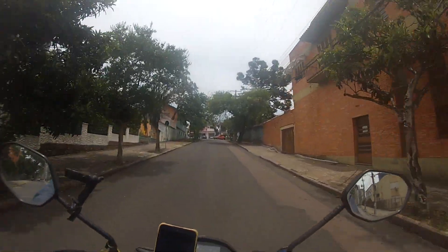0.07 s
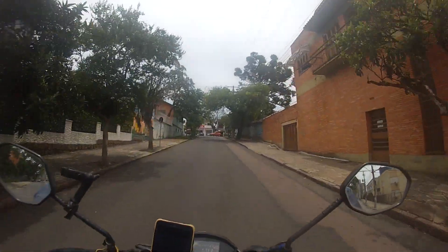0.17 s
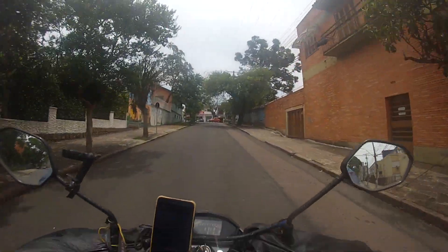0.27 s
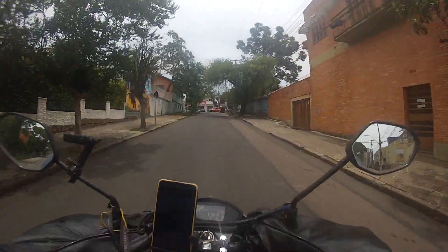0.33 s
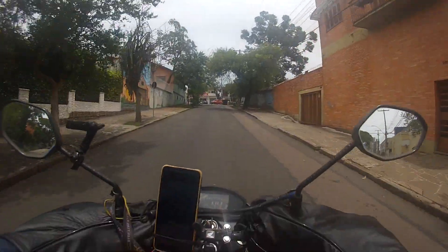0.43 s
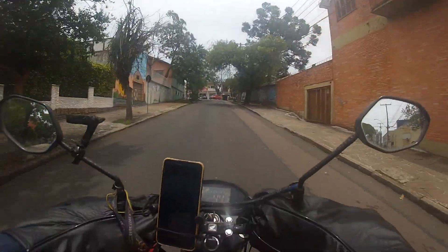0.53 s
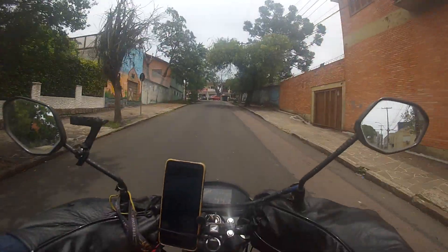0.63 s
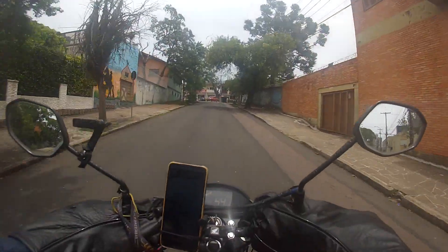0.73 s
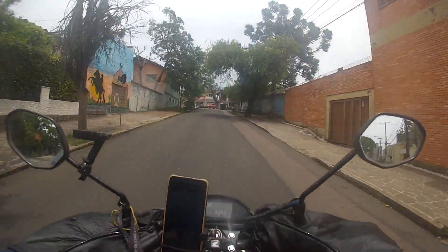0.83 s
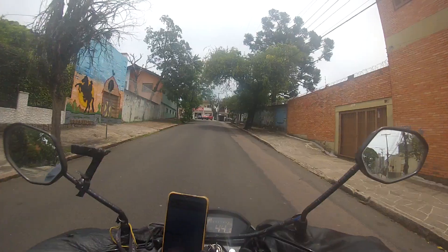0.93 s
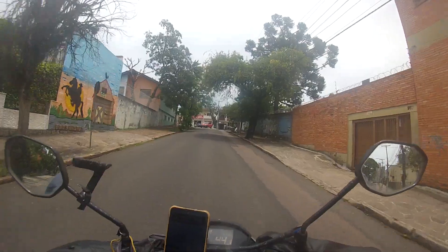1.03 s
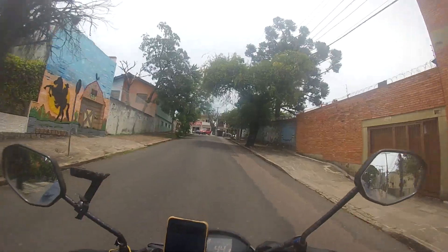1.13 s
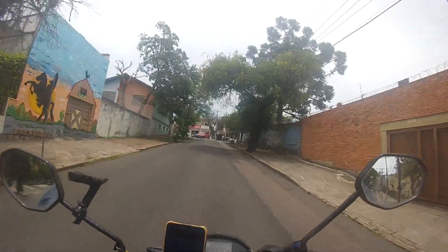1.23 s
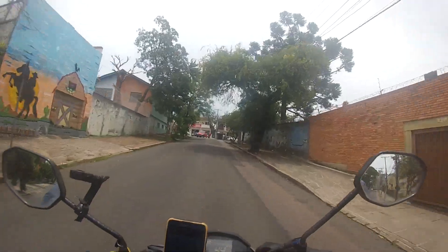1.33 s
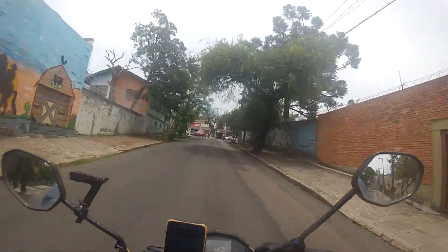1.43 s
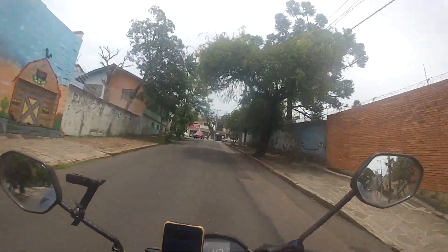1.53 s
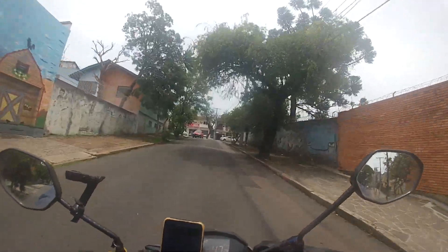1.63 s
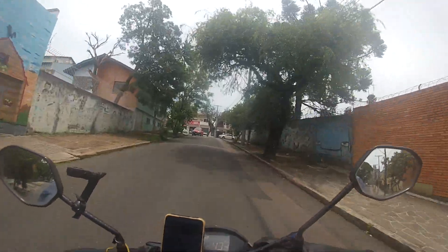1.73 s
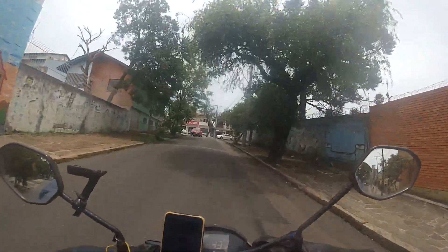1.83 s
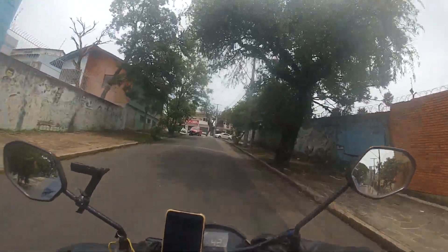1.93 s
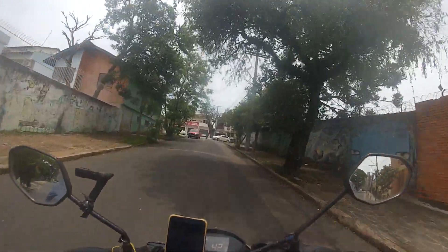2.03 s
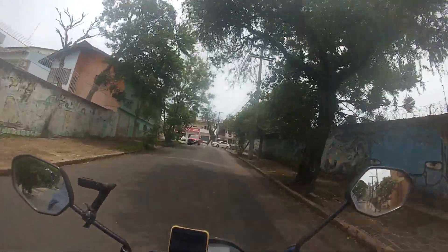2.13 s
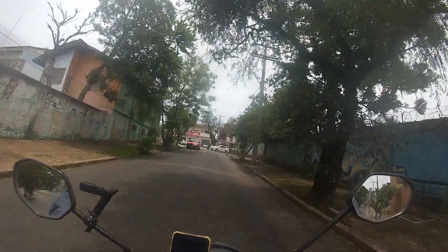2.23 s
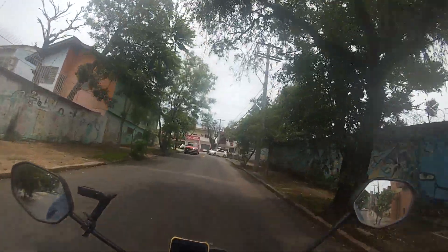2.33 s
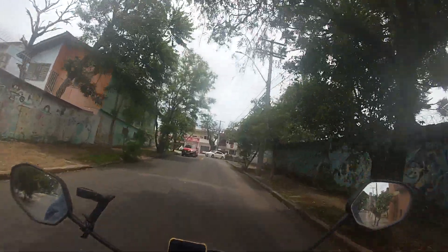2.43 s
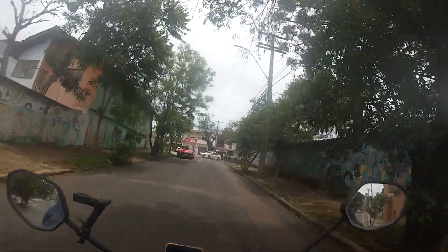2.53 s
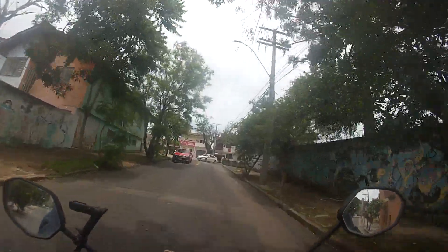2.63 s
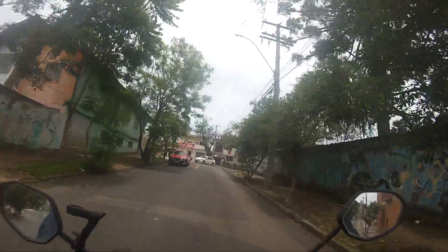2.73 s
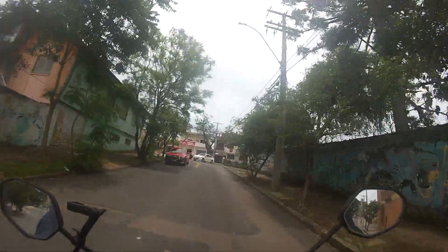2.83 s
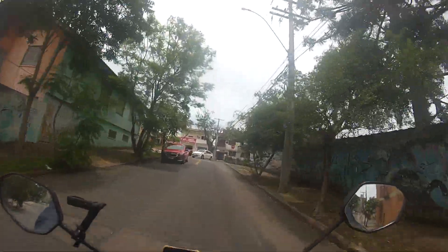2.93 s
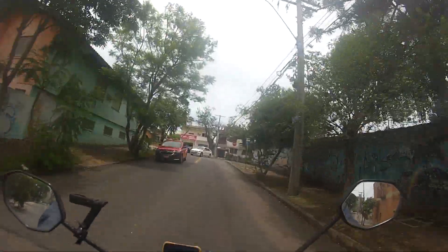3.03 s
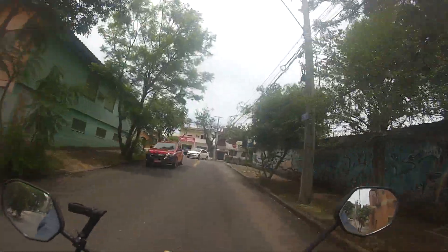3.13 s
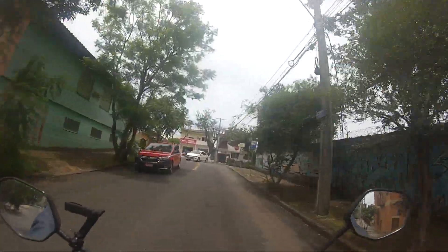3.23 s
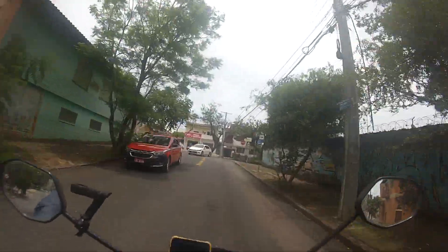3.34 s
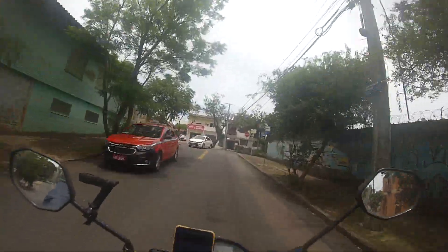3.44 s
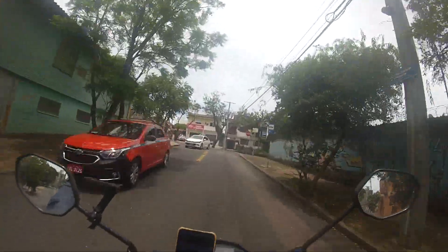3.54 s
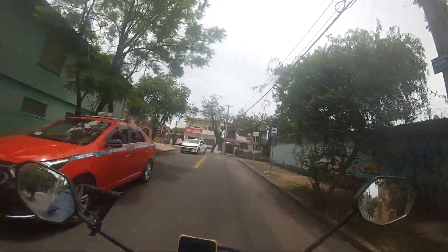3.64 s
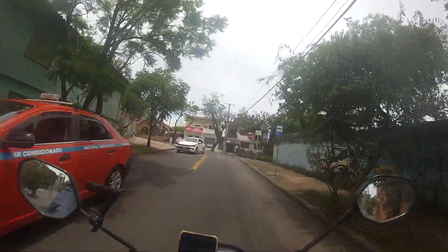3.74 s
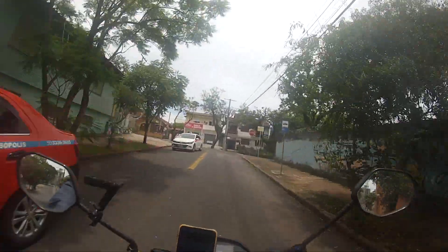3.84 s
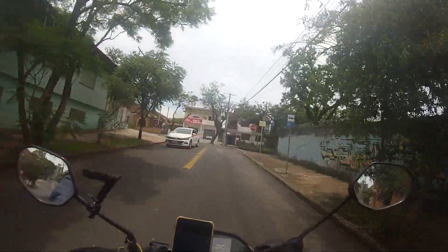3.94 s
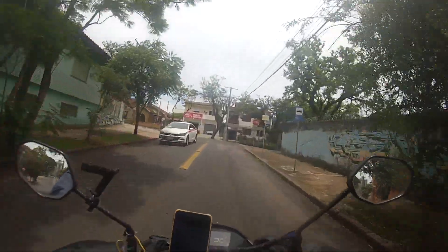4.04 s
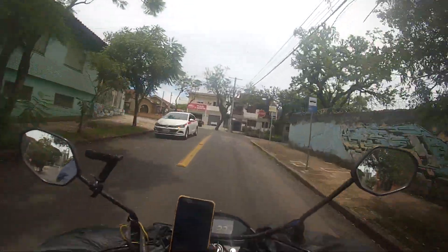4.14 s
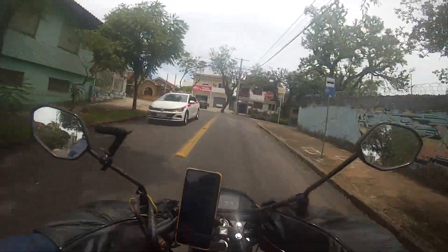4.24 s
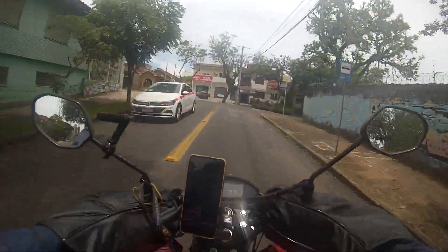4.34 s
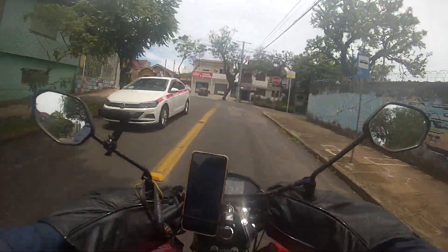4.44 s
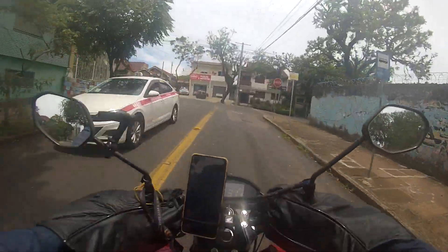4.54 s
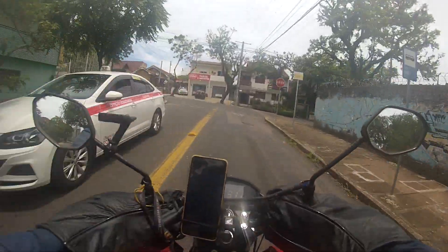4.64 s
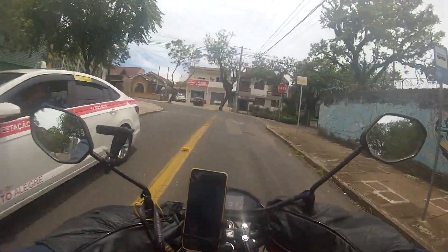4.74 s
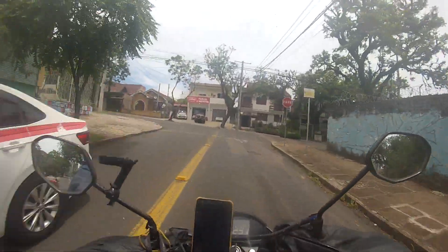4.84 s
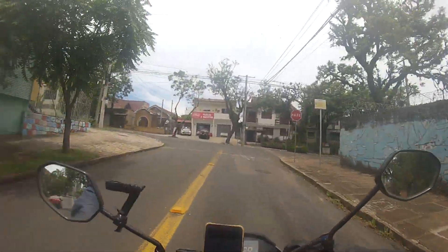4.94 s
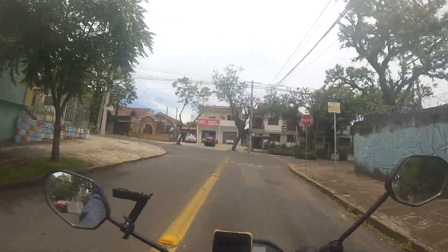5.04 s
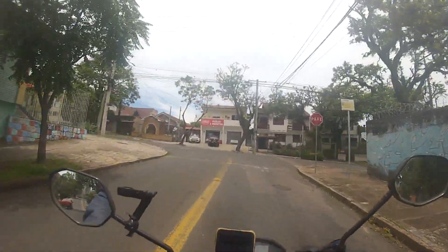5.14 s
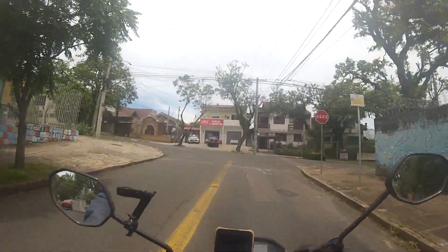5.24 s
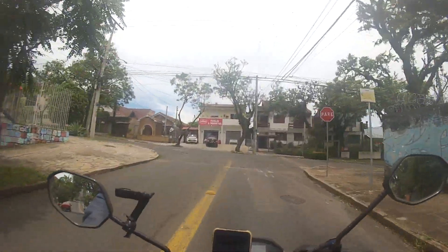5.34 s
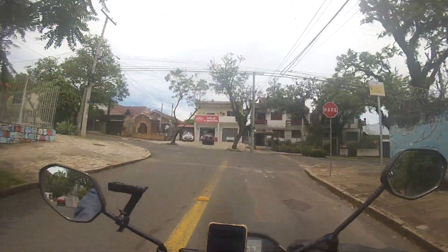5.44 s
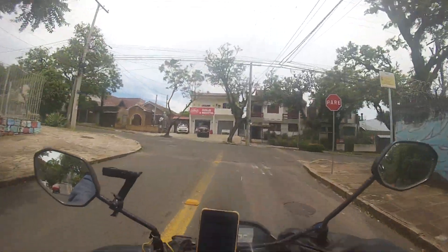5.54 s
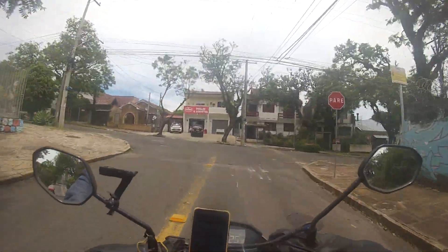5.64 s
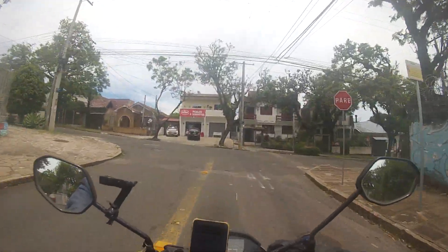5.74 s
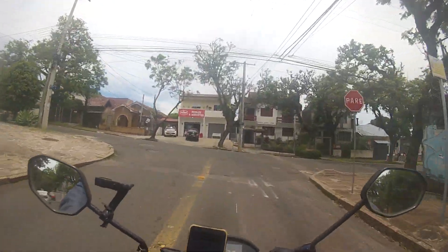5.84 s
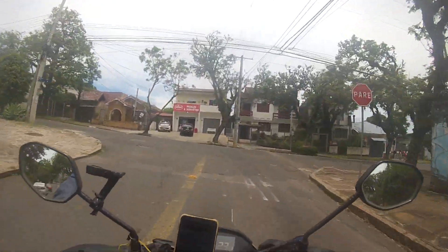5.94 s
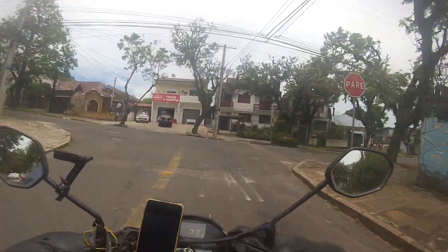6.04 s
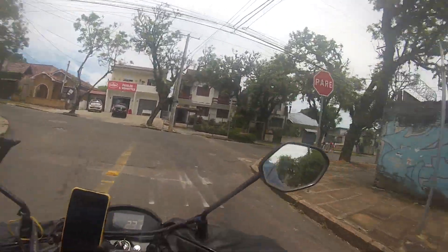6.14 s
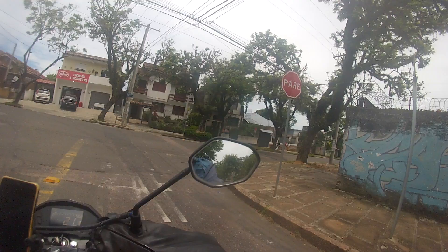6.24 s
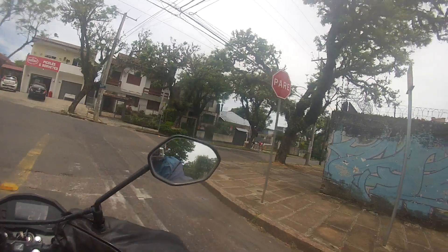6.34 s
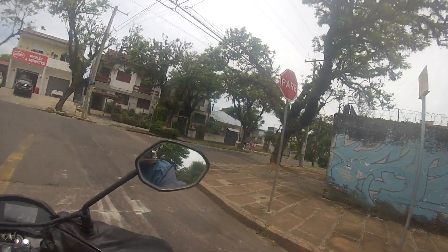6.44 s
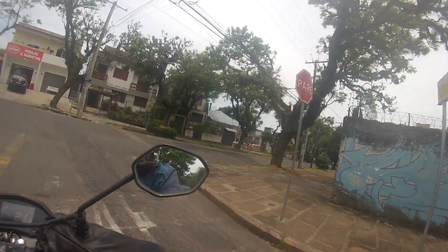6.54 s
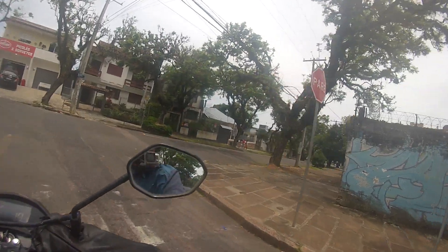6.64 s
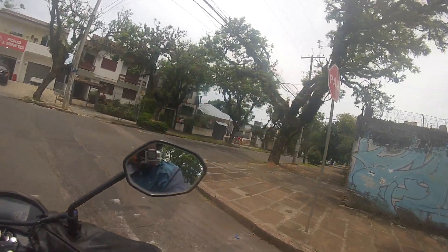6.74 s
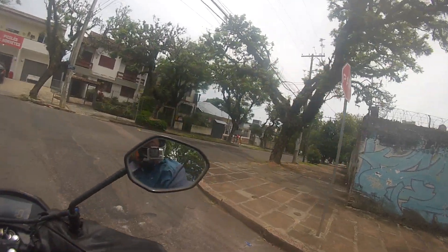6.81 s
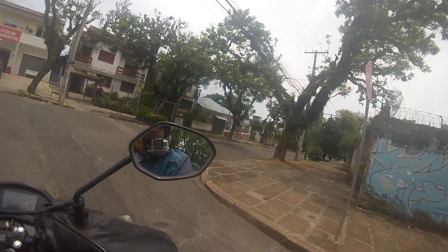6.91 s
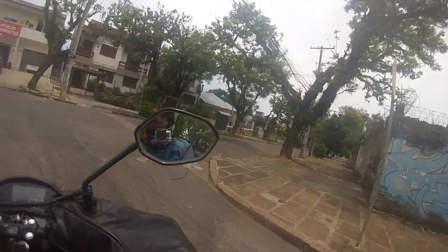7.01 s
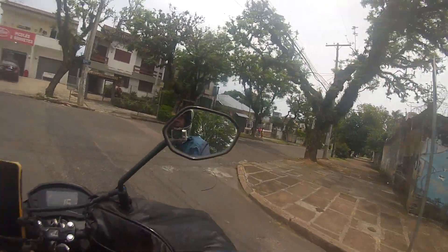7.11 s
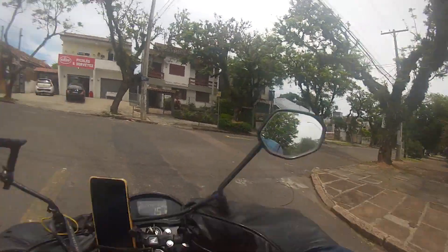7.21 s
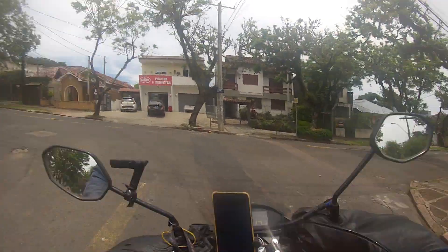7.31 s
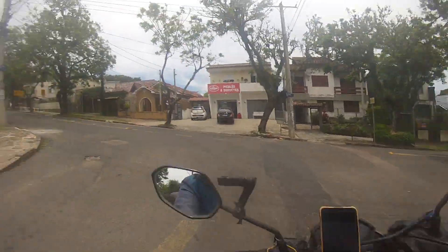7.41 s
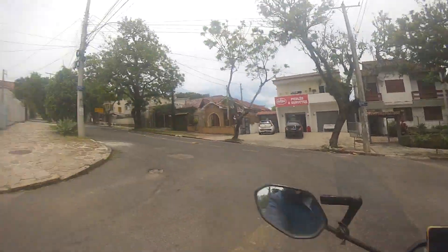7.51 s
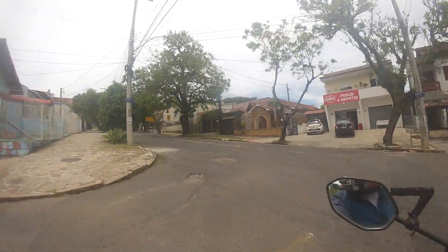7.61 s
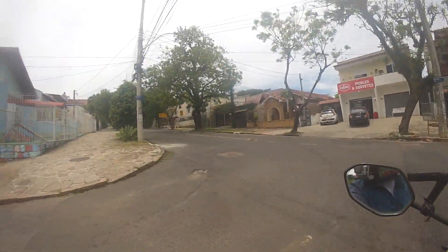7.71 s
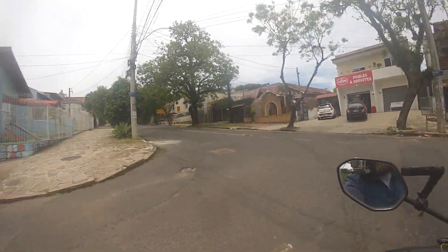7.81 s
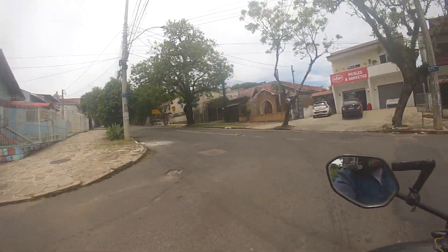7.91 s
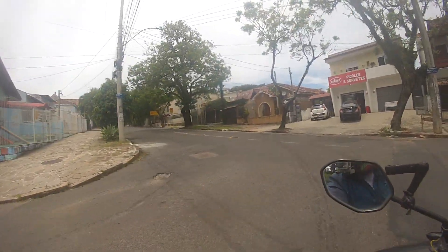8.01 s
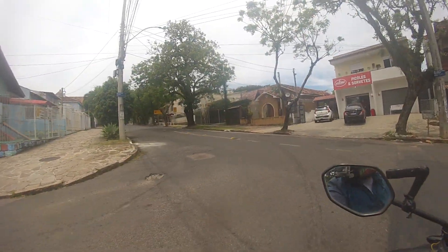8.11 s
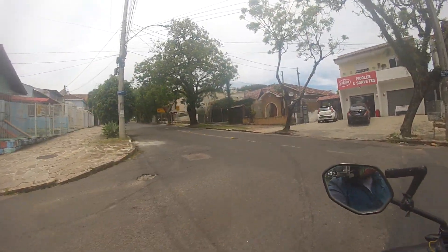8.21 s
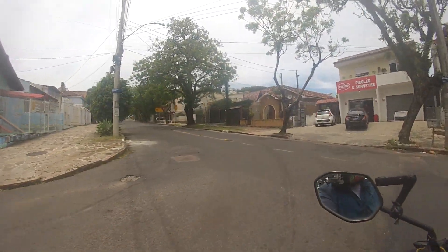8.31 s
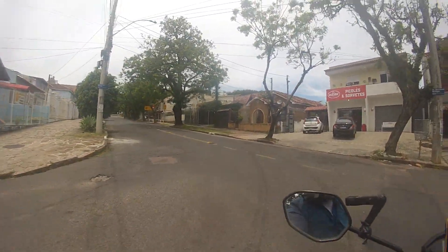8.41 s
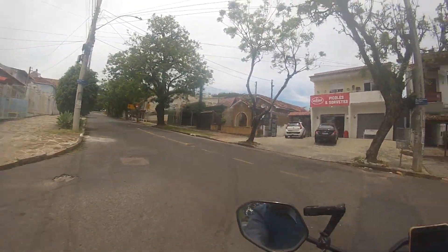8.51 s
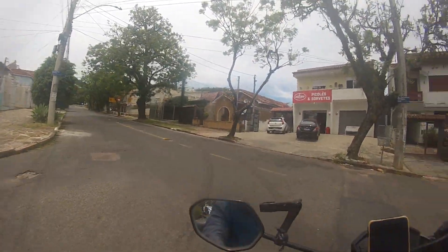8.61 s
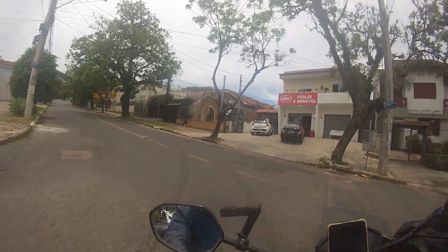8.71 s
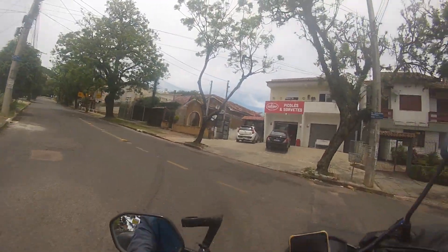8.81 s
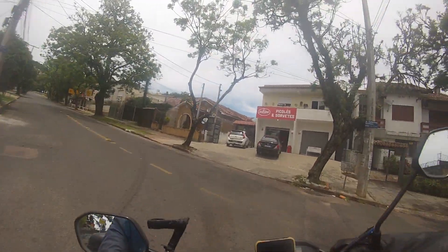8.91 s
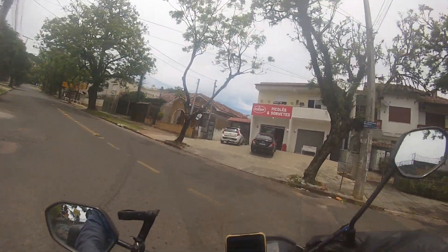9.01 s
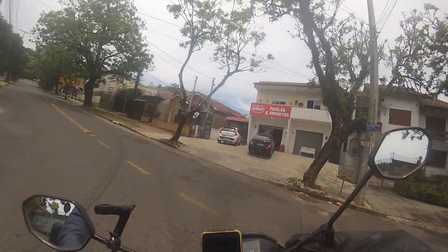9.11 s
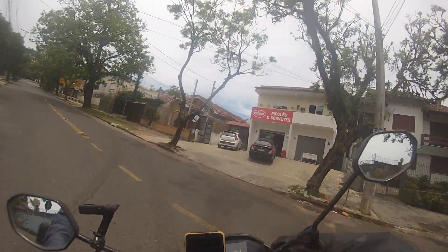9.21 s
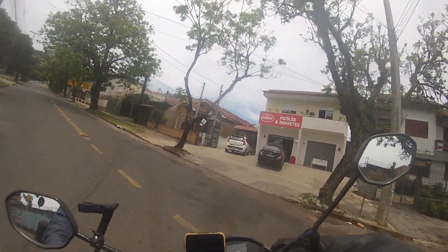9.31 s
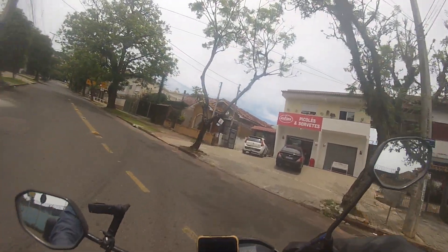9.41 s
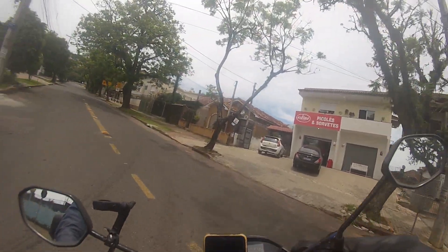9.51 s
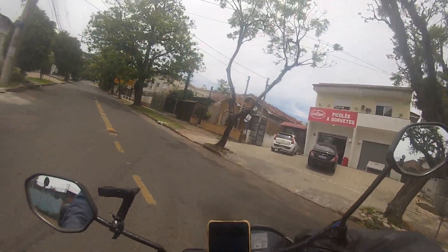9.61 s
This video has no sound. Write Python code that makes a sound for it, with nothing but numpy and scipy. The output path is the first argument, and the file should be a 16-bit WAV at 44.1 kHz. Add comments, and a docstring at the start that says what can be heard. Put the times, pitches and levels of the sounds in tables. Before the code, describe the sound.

Heard from a motorcycle rider's helmet on a street: heavy low wind buffeting over a small single-cylinder engine's throb, metallic clatter and gear whine. The throttle closes, loose parts knock over bumps, a strong gust thumps and crackles the microphone, and two cars swish by. The engine drops to a slow putter, clunks into gear, and its revs rise again in much calmer air.

```python
"""A small single-cylinder motorcycle, heard from the rider's helmet, pulls, slows and clunks into gear.
Its revs then climb again. Exhaust puffs excite silencer modes, clatter shakes the casing, gear teeth sing.
Drive-train tones flutter; a whistle climbs twice. Shaped noise makes wind, tyres, two cars, intake and hiss.
Decaying modes make helmet thuds, knocking loose parts and the gear clunk; noise bursts make crackles.
Revs and throttle drive the engine's levels; the bike's speed drives those of wind, tyres and drive train."""
import sys
import numpy as np
from scipy import signal
from scipy.fft import rfft, irfft, next_fast_len
from scipy.io import wavfile
from scipy.ndimage import uniform_filter1d

SR = 44100
rng = np.random.default_rng(int(sys.argv[2]) if len(sys.argv) > 2 else 0)


def pcm_store(signal):
    """Save signal as 16-bit PCM."""
    levels = np.round(np.clip(np.atleast_2d(signal), -1, 1) * 32767)
    wavfile.write(sys.argv[1], SR, levels.astype(np.int16).T)


N = 426006
TIME = np.arange(N) / SR

# The rider's hand. Each row: time in seconds, firings per second, throttle from 0 to 1.
ENGINE = [(0, 23.5, .96), (.37, 24.9, 0.98), (.55, 23.9, .92), (1.2, 25, 0.91), (1.93, 24, 0.78),
          (2.1, 22.8, .5), (2.55, 22.7, 0), (3.4, 19.7, 0.37), (3.8, 21.5, 0.24), (4.5, 18.2, 0.13),
          (6.1, 12.5, 0.27), (7.2, 12.9, 0.06), (7.55, 17.1, 0.38), (7.73, 16.5, .33), (7.81, 15.3, 0),
          (7.99, 21.4, 0.33), (8.15, 22.6, 0.47), (8.33, 20, 0.45), (8.75, 22.6, .45), (9.45, 25.4, 0.62),
          (9.66, 26.6, 0.82)]
# The bike's speed. Each row: time in seconds, speed as a share of cruising speed.
SPEED = [(0, 1.12), (.8, 1.01), (1.5, 0.96), (3.3, 0.77), (4.4, 0.71), (5.2, 0.55), (5.75, 0.5),
         (6.2, 0.39), (6.9, 0.23), (7.55, 0.34), (8, 0.22), (9.15, 0.22), (9.66, 0.22)]

# Engine levels. Each holds: dB at cruising revs with the throttle shut, dB added at full throttle,
# dB per doubling of the revs.
EXHAUST_LAW = (-45, 4, 0.8)
CLATTER_LAW = (-59, 8.1, 3.3)
INTAKE_LAW = (-65.5, 22.8, 0.62)
PRIMARY_LAW = (-73.5, 8.6, 5.6)
GEARBOX_LAW = (-71.5, 13.2, 5.2)   # level before the casing
CRUISE_FIRING_HZ = 24
PULSE_THROTTLE = 0.38   # the load throbs fully from this throttle upwards

# Silencer modes. Each row: frequency in Hz, relative level in dB, 60 dB decay time in seconds.
EXHAUST_MODES = [(46.7, 6, 0.11), (83, -10, 0.12), (111, -8.5, 0.15), (173, -14, 0.11), (229, -28, 0.15),
                 (290, -31, 0.11)]
PISTON_SHARE = 0.53   # height of the weaker puff, in the turn between firings
# Modes of crankcase, fins and covers. Each row: frequency in Hz, nominal width in Hz, level in dB.
CASING_MODES = [(807.7, 13.4, 3.5), (916, 47, 2.5), (1132, 125, 2), (1463, 132, 4.5), (1643, 132, 6),
                (1973, 120, -1.5), (2293, 440, -1), (2609, 85, -3.5), (3090, 88, -13.5), (3450, 250, -6.5),
                (4293, 110, -12), (5290, 720, -17.5), (6200, 340, -15), (7170, 880, -21.5),
                (7970, 140, -19)]
CASING_WIDENING = 1.07   # factor on every nominal width
# Gearbox tooth rates. Each row: multiple of the firing rate, relative level in dB.
TEETH = [(82, -10), (121, -1.5), (141, -1), (176, -11), (186, 0), (268, -13), (320, -19)]
PRIMARY_TEETH = 68   # tooth contacts per firing
# Swells of the primary-gear whine. Each row: start in seconds, length in seconds, level in dB.
PRIMARY_WHINES = [(.17, 0.23, -47.5), (.48, .06, -45), (2.0, 0.14, -56), (3.73, .12, -54.5),
                  (8.05, 0.19, -62), (8.75, 0.38, -64), (9.07, 0.52, -58)]
PRIMARY_ATTACK_S, PRIMARY_RELEASE_S = 0.12, 0.15
# Swells of the gearbox whine. Each row: start in seconds, length in seconds, level in dB before the casing.
GEARBOX_WHINES = [(2.0, 0.45, -60), (7.88, 0.19, -57.5), (8.08, 0.19, -58), (8.33, 0.37, -57.5),
                  (8.66, 0.31, -62), (8.98, 1, -55)]
WHINE_ATTACK_S, WHINE_RELEASE_S = 0.082, 0.11
# Whistle under hard pull, one table for each glide.
# Each row: time in seconds, frequency in Hz, level in dB before throb and flutter.
WHISTLES = [
    [(.05, 1590, -62), (.18, 1612, -46), (.29, 1640, -45), (.35, 1690, -52), (.42, 1750, -63)],
    [(8.35, 1480, -72), (8.55, 1515, -59), (8.72, 1530, -59), (9.02, 1560, -59), (9.15, 1610, -58),
     (9.28, 1650, -54), (9.45, 1655, -54), (9.56, 1690, -70)],
]
# Drive-train tones. Each row: frequency in Hz, level in dB at cruising speed.
RINGING = [(812, -63), (1075, -62.5), (1660, -59), (3440, -70.5)]
RINGING_DOUBLING_DB = 9.5   # dB per doubling of the speed
# Faint squeak as the throttle closes. The row: start in seconds, length in seconds, frequency in Hz, level in dB.
SQUEAK = (2.01, .025, 4720, -67)

# Air and road levels. Each holds: dB at cruising speed, dB per doubling of the speed.
HUM_LAW = (-28.5, 12.4)
EDDY_LAW = (-30.5, 7.7)
GUST_LAW = (-26, 11)
TYRE_LAW = (-51.5, 3.54)

# Big gusts that shove the microphone. Each row: start in seconds, length in seconds, level in dB.
GUSTS = [(3.08, 0.15, -21), (3.3, 0.26, -16), (4.35, 0.6, -29), (5.77, 0.25, -23), (6.15, 0.32, -26.5),
         (6.6, 4, -41), (8.2, 0.24, -34)]
GUST_ATTACK_S, GUST_RELEASE_S = 0.1, 0.26
# Eddies breaking on the shell. Each row: start in seconds, length in seconds, level in dB.
EDDIES = [(0, 0.4, -18), (.58, 0.05, -21), (.98, 0.56, -25), (1.56, 0.13, -21), (1.89, 0.068, -19),
          (2.3, 0.2, -23), (2.78, 0.14, -25), (3.46, 0.18, -24), (3.89, 0.14, -24.5), (4.36, 0.094, -22.5),
          (4.74, 0.26, -25.5), (5.65, 0.093, -22.5), (8.1, 0.4, -40)]
EDDY_ATTACK_S, EDDY_RELEASE_S = 0.043, 0.14
# Passing cars. Each row: start in seconds, length in seconds, level in dB.
CARS = [(3.3, 0.95, -55.5), (4.6, 0.47, -52.5)]
CAR_APPROACH_S, CAR_LEAVE_S = 0.58, 0.32

# Noise spectra: slow pressure swings, shell boom, helmet air space, tyres, air intake, microphone hiss.
# Each row: frequency in Hz, relative density in dB per Hz.
GUST_COLOUR = [(11, -10.5), (14.5, 13), (18, 12), (25, -11.5), (32, -4), (42, -31), (58, -19)]
BUFFET_COLOUR = [(30, -11.5), (41, -34.5), (49, -1), (54, 2), (58, -1.5), (63, -4), (75, -19.5), (100, -27)]
HELMET_COLOUR = [(55, 1.5), (74, 5.5), (90, 0.5), (118, 1), (138, -9), (160, -11.5), (191, 0.5),
                 (206, -3.5), (224, 1.5), (241, -1), (259, -14.5), (294, -9), (322, -26.5), (500, -29.5)]
ROAD_COLOUR = [(160, 10), (340, -3), (470, 1.5), (700, -3), (910, 0), (1090, 0.5), (1260, -5), (1510, -1.5),
               (1910, -1), (2560, -8), (2800, -26), (5000, -22), (8000, -25.5), (14000, -49)]
INTAKE_COLOUR = [(160, 6.5), (340, 4), (470, 1.5), (700, -8.5), (910, -1.5), (1090, 0), (1260, -4),
                 (1510, 1.5), (2000, -1.5), (2560, -6.5), (2800, -14.5), (4300, -17), (8000, -25),
                 (14000, -45)]
HISS_COLOUR = [(400, 1), (3100, 6), (6100, -3), (9100, -4), (12100, -5), (15300, -9.5)]
HISS_DB = -64.5

# Crackles in the port. Each row: time in seconds, burst level in dB before filtering.
CRACKLES = [(3.4447, -43), (3.4492, -41), (3.4997, -38)]
# Thuds through the helmet. Each row: time in seconds, level in dB before softening, frequency in Hz,
# 60 dB decay time in seconds.
THUDS = [(0.361, -9.5, 60.5, 0.12), (3.058, -11.5, 43.2, 0.21), (3.175, -27, 225, 0.12),
         (3.395, -24, 203, 0.12), (3.43, -15, 30, .1), (3.488, -26, 40.4, 0.053), (3.568, -12.5, 48, 0.088),
         (4.257, -29, 229, 0.11), (5.656, -23, 53, 0.15), (7.65, -27, 50.7, 0.17), (8.075, -27, 55.5, 0.16),
         (8.989, -20.5, 44, 0.091)]
# Loose parts knocking over bumps. Each row: time in seconds, peak level in dB, main pitch in Hz,
# 60 dB decay time in seconds, share of clear ring from 0 to 1.
KNOCKS = [(2.338, -48, 410, 0.039, 0.5), (2.338, -36.5, 1600, 0.022, .25), (2.341, -32, 870, 0.056, 0.46),
          (2.463, -41, 930, 0.041, .65), (2.464, -44, 1450, .03, .6), (3.291, -38, 1440, .04, 0.4),
          (3.295, -43, 1120, 0.06, 0.8), (3.540, -36.5, 1350, 0.048, 0.46), (5.546, -47, 1120, .04, .6),
          (5.745, -49, 1170, .045, .65), (5.870, -37, 1103, 0.059, .65), (6.358, -45, 1580, 0.046, 0.6),
          (6.357, -44.5, 383, 0.23, 0.36), (6.860, -50, 3960, .04, .05), (6.929, -51, 4000, .05, .05),
          (7.507, -38, 1130, 0.039, 0.65), (8.537, -47, 500, 0.1, 0.67)]
KNOCK_ATTACK_S = 0.002
# Fittings chattering over rough asphalt. Each row: start in seconds, length in seconds, level in dB.
RATTLES = [(3.23, 0.1, -50), (3.39, 0.057, -49)]
RATTLE_EDGE_S = 0.043
# Spectrum of the chatter. Each row: frequency in Hz, relative density in dB per Hz.
RATTLE_COLOUR = [(900, 0), (1150, 6), (2300, 2), (2900, -11), (6000, -32)]
# Gear dogs engaging and rebounding. Each row: time in seconds, mean strike level in dB.
SHIFT = [(7.6492, -34.5), (7.6556, -43), (7.6626, -43.5), (7.6682, -48), (7.679, -52)]
# Gearbox modes. Each row: frequency in Hz, relative level in dB, 60 dB decay time in seconds.
CLUNK_MODES = [(105, -8, .09), (172, -5, 0.061), (485, -13.5, 0.18), (560, 1, 0.075), (835, -7.5, 0.094),
               (1060, 9, 0.0095), (1100, -10, 0.024), (1340, 2, 0.021), (1465, 0, 0.063), (1725, -13, .03),
               (2540, -8, 0.035), (3270, -26, .02)]
CUTOFF_HZ = 15300


def from_db(db):
    """Logarithmic level: decibels become an amplitude ratio."""
    return 10 ** (np.asarray(db) / 20)


def rms_one(x):
    """Normalisation: scale a signal to unit mean power."""
    return x / np.sqrt(np.mean(x ** 2) + 1e-20)


def in_time(rows):
    """Linear interpolation: one curve per column, a value for every sample."""
    seconds, *columns = np.transpose(rows)
    return [np.interp(TIME, seconds, column) for column in columns]


def drift(rate):
    """Low-passed noise: a random wander of spread 1, weakening above the rate in Hz."""
    hz = np.arange(N // 2 + 1) * SR / N
    spectrum = rfft(rng.standard_normal(N)) / (1 + (hz / rate) ** 2)
    return rms_one(irfft(spectrum, N))


def noise(colour):
    """Spectral shaping: unit noise follows a given density and falls away beyond both ends."""
    size = next_fast_len(N)
    hz = np.maximum(np.arange(size // 2 + 1) * SR / size, 1)
    points, level_db = np.transpose(colour)
    ends = np.minimum(hz / points[0], 1) * np.minimum(points[-1] / hz, 1) ** 2
    gain = from_db(np.interp(np.log(hz), np.log(points), level_db)) * ends ** 2
    spectrum = rfft(rng.standard_normal(size)) * gain
    return rms_one(irfft(spectrum, size)[:N])


def evened(x, seconds):
    """Gain control: dividing by the local RMS holds near unit power over spans of the given length."""
    size = max(int(seconds * SR), 1)
    power = uniform_filter1d(uniform_filter1d(x ** 2, size), size)
    return x / np.sqrt(power + 1e-9)


def resonance(x, hz, width):
    """Damped resonator: a two-pole band-pass with a gain of about 1 at its peak."""
    r = np.exp(-np.pi * width / SR)
    zeros = np.array([1, 0, -1]) * (1 - r * r) / 2
    poles = [1, -2 * r * np.cos(2 * np.pi * hz / SR), r * r]
    return signal.lfilter(zeros, poles, x + 1e-18)


def ring(clicks, hz, t60):
    """Impulse response of a mode: a unit click starts a decaying sine of initial height 1."""
    r = np.exp(-np.log(1000) / (t60 * SR))
    w = 2 * np.pi * hz / SR
    return signal.lfilter([0, np.sin(w)], [1, -2 * r * np.cos(w), r * r], clicks + 1e-18)


def decay(t60):
    """Exponential decay: a quarter-second envelope falling by 60 dB in t60 seconds."""
    return np.exp(-np.log(1000) * TIME[:SR // 4] / t60)


def burst(t60):
    """Transient noise: white noise under an exponential decay."""
    envelope = decay(t60)
    return rng.standard_normal(len(envelope)) * envelope


def add(out, s, sound):
    """Superposition: mix a short sound in at time s in seconds."""
    start = int(s * SR)
    out[start:start + len(sound)] += sound[:N - start]


def tone(hz, waver, rate):
    """Frequency modulation: a unit-power sine wavers by a share of its pitch, at about the rate in Hz."""
    cycles = np.cumsum(hz * (1 + waver * drift(rate))) / SR
    return np.sqrt(2) * np.sin(2 * np.pi * cycles)


def swells(rows, attack_s, release_s):
    """Envelope: each gain rises around its start, holds, and falls around its end."""
    gain = 0
    for s, length, db in rows:
        rise = np.clip(.5 + (TIME - s) / attack_s, 0, 1)
        fall = np.clip(.5 + (s + length - TIME) / release_s, 0, 1)
        gain = gain + from_db(db) * rise * fall
    return gain


def by_effort(law):
    """Power law of engine sound: gain grows with the throttle and with the revs."""
    shut_db, throttle_db, doubling_db = law
    firing_hz, throttle = in_time(ENGINE)
    doublings = np.log2(firing_hz / CRUISE_FIRING_HZ)
    return from_db(shut_db + throttle_db * throttle + doubling_db * doublings)


def by_speed(law):
    """Power law of flow and rolling sound: gain is a power of the bike's speed."""
    cruise_db, doubling_db = law
    speed, = in_time(SPEED)
    return from_db(cruise_db + doubling_db * np.log2(np.maximum(speed, 1e-3)))


def throb(cycle, turn_depth, firing_depth):
    """Amplitude modulation by load: a pulse each turn, stronger at each firing, fades as the throttle shuts."""
    _, throttle = in_time(ENGINE)
    pulse = np.cos(2 * np.pi * cycle) ** 4   # two turns, so two pulses, per firing cycle
    load = turn_depth * (pulse - pulse.mean()) + firing_depth * np.cos(2 * np.pi * cycle)
    return 1 + np.minimum(throttle / PULSE_THROTTLE, 1) * load


def casing(force):
    """Modal radiation: the engine's metal passes a force on through its resonances."""
    out = 0
    for k, (hz, nominal_width, db) in enumerate(CASING_MODES):
        width = CASING_WIDENING * nominal_width
        mode = resonance(resonance(force, hz, width), hz, width)
        out = out + (-1) ** k * from_db(db) * mode   # neighbours in opposite phase
    return out


def exhaust(cycle, uneven_db=2.5, stumble=0.016, puff_low_hz=40, puff_cut_hz=500):
    """Pulse excitation: one puff a turn, strong and weak in turn, rings the silencer; force and timing wander."""
    turn = np.floor(2 * (cycle + stumble * drift(22.7)))
    starts = np.diff(turn, prepend=turn[0]) > 0
    puffs = starts * np.where(turn % 2, PISTON_SHARE, 1) * from_db(uneven_db * drift(2.2))
    band = signal.butter(1, [puff_low_hz, puff_cut_hz], "band", fs=SR, output="sos")
    puffs = signal.sosfilt(band, puffs + 1e-18)
    ringing = sum(from_db(db) * ring(puffs, hz, t60) for hz, db, t60 in EXHAUST_MODES)
    return evened(ringing, seconds=0.79)


def clatter(cycle, grain_db=-0.1):
    """Random excitation: piston, valves and chain rattle the casing, in a pulse once a turn."""
    beat = throb(cycle, turn_depth=.95, firing_depth=.12)
    force = rng.standard_normal(N) * beat * from_db(grain_db * drift(200))
    return rms_one(casing(force))


def whine(cycle, teeth, ripple=0.68, jitter=1.0, flutter_db=-0.5):
    """Phase modulation: crank surges at each firing spread the note of meshing teeth into rough sidebands."""
    surge = ripple * np.sin(2 * np.pi * cycle)   # radians, as is the jitter
    phase = 2 * np.pi * teeth * cycle + surge + jitter * drift(81)
    load = throb(cycle, turn_depth=.9, firing_depth=.22)
    return rms_one(np.sin(phase) * load * from_db(flutter_db * drift(41)))


def engine(gear_jitter=1.76, primary_jitter=1.0):
    """Common drive: exhaust, clatter, gears and the whistle's throb all follow one crankshaft."""
    firing_hz, _ = in_time(ENGINE)
    cycle = np.cumsum(firing_hz * (1 + 0.00303 * drift(5.57))) / SR   # firings so far
    primary_gain = by_effort(PRIMARY_LAW) + swells(PRIMARY_WHINES, PRIMARY_ATTACK_S, PRIMARY_RELEASE_S)
    primary = primary_gain * whine(cycle, PRIMARY_TEETH, jitter=primary_jitter)
    mesh = sum(from_db(db) * whine(cycle, teeth, ripple=2.7, jitter=gear_jitter) for teeth, db in TEETH)
    mesh_gain = by_effort(GEARBOX_LAW) + swells(GEARBOX_WHINES, WHINE_ATTACK_S, WHINE_RELEASE_S)
    # the gearbox tones glide through the casing's resonances and light them up in turn
    gears = primary + casing(mesh_gain * mesh)
    puffs = by_effort(EXHAUST_LAW) * exhaust(cycle)
    return puffs + by_effort(CLATTER_LAW) * clatter(cycle) + gears + whistle(cycle)


def drive_train(waver=0.01795, flicker_db=5.5, squeak_waver=.014, wander=.012):
    """Random modulation: metallic tones flutter and wander as the bike rolls, with one short squeak."""
    out = 0
    for hz, db in RINGING:
        note = tone(hz * (1 + wander * drift(3)), waver, 92.2)
        flickering = rms_one(note * from_db(flicker_db * drift(33)))
        out = out + by_speed((db, RINGING_DOUBLING_DB)) * flickering
    s, length, hz, db = SQUEAK
    return out + swells([(s, length, db)], length / 2, length / 2) * tone(hz, squeak_waver, 90)


def wind():
    """Turbulent pressure: slow gusts, eddies booming on the shell, and the hum of the helmet's air space."""
    # speed-driven wind and single swells add in power
    gust_gain = np.hypot(by_speed(GUST_LAW), swells(GUSTS, GUST_ATTACK_S, GUST_RELEASE_S))
    gusts = gust_gain * evened(noise(GUST_COLOUR), seconds=0.058)
    eddy_gain = np.hypot(by_speed(EDDY_LAW), swells(EDDIES, EDDY_ATTACK_S, EDDY_RELEASE_S))
    eddies = eddy_gain * evened(noise(BUFFET_COLOUR), seconds=0.064)
    hum = by_speed(HUM_LAW) * evened(noise(HELMET_COLOUR), seconds=0.23)
    return gusts + eddies + hum


def road(grain_db=1.5):
    """Broadband noise: tyres, two passing cars, and an intake that grows with throttle flicker together."""
    tyre_gain = np.hypot(by_speed(TYRE_LAW), swells(CARS, CAR_APPROACH_S, CAR_LEAVE_S))
    tyres = tyre_gain * noise(ROAD_COLOUR)
    intake = by_effort(INTAKE_LAW) * noise(INTAKE_COLOUR)
    return (tyres + intake) * from_db(grain_db * drift(38))


def microphone(crackle_t60=0.017, port_hz=3920, dull=0.63):
    """Self-noise and port resonance: steady hiss, and brief crackles during the strongest gust."""
    crackles = np.zeros(N)
    for s, db in CRACKLES:
        add(crackles, s, from_db(db) * burst(crackle_t60))
    crackles = signal.lfilter([1 - dull], [1, -dull], crackles)   # one-pole low-pass
    hiss = from_db(HISS_DB) * noise(HISS_COLOUR)
    return crackles + 2.1 * resonance(crackles, port_hz, 380) + hiss


def whistle(cycle, flutter_db=-1.5):
    """Gliding tone: under hard pull a narrow whistle climbs, amplitude-modulated by the engine's load."""
    out = 0
    for glide in WHISTLES:
        hz, level_db = in_time(glide)
        sounding = (TIME >= glide[0][0]) & (TIME <= glide[-1][0])
        out = out + sounding * from_db(level_db) * tone(hz, .005, 60)
    return out * throb(cycle, turn_depth=.5, firing_depth=0.067) * from_db(flutter_db * drift(20))


def thuds(soft_ratio=1.9):
    """Impulse response: a jolt, softened by a low-pass, sets the helmet booming briefly."""
    out = np.zeros(N)
    for s, db, hz, t60 in THUDS:
        boom = ring(signal.unit_impulse(SR // 2), hz, t60)
        soften = signal.butter(2, soft_ratio * hz, fs=SR, output="sos")
        add(out, s, from_db(db) * signal.sosfilt(soften, boom))
    return out


def knocks(dull_ratio=1.55, low_share=0.66, grain_db=4):
    """Impact: each bump excites a decaying note inside a dull rattle; rough asphalt makes fittings chatter."""
    chatter = rms_one(noise(RATTLE_COLOUR) * from_db(grain_db * drift(100)))
    out = swells(RATTLES, RATTLE_EDGE_S, RATTLE_EDGE_S) * chatter
    t = TIME[:SR // 4]
    for s, db, hz, t60, clear in KNOCKS:
        band = signal.butter(3, [low_share * hz, dull_ratio * hz], "band", fs=SR, output="sos")
        shake = signal.sosfilt(band, burst(t60))
        shake = shake / np.max(np.abs(shake))
        note = np.sin(2 * np.pi * hz * t) * decay(t60)
        sound = (clear * note + (1 - clear) * shake) * np.minimum(t / KNOCK_ATTACK_S, 1)
        add(out, s, from_db(db) * sound / np.max(np.abs(sound)))
    return out


def gear_shift(oil_cut_hz=2400):
    """Modal impact: the dogs strike home, cushioned by oil, and bounce, ringing the gearbox."""
    at, level_db = np.transpose(SHIFT)
    out = np.zeros(N)
    for hz, db, t60 in CLUNK_MODES:
        clicks = np.zeros(N)
        uneven_db = rng.normal(0, 1, len(at))   # each strike excites each mode a little differently
        clicks[(at * SR).astype(int)] = from_db(level_db + db + uneven_db)
        out += ring(clicks, hz, t60)
    return signal.sosfilt(signal.butter(2, oil_cut_hz, fs=SR, output="sos"), out)


def scene():
    """Superposition: all sources add at the one microphone on the helmet."""
    machine = engine() + drive_train()
    surroundings = wind() + road() + microphone()
    return (machine + surroundings + thuds() + knocks() + gear_shift())[None]


def record(dry):
    """Band limiting: an elliptic low-pass cuts the top steeply."""
    low_pass = signal.ellip(10, .1, 80, CUTOFF_HZ, fs=SR, output="sos")   # ripple and stop-band in dB
    return signal.sosfilt(low_pass, dry)


dry = scene()
out = record(dry)
pcm_store(out)
```